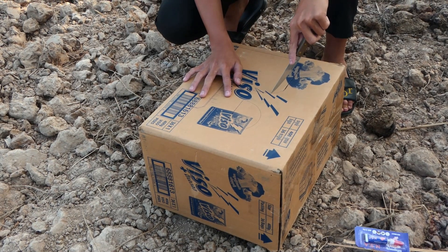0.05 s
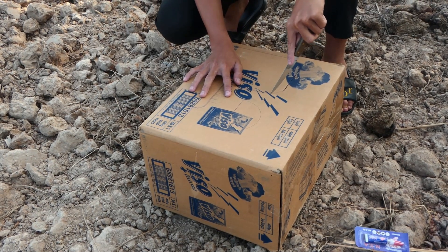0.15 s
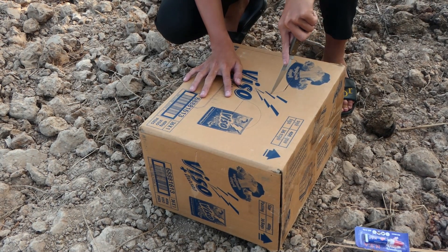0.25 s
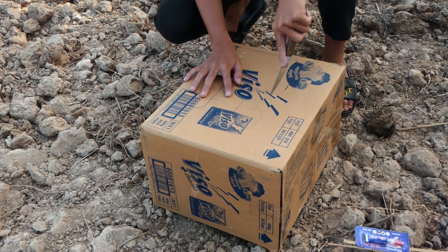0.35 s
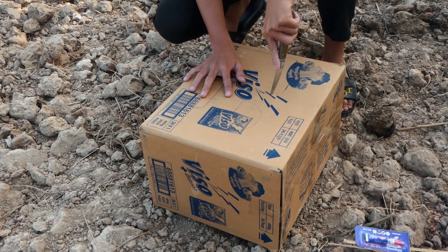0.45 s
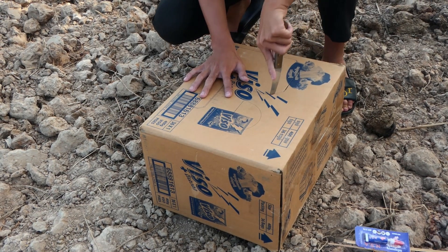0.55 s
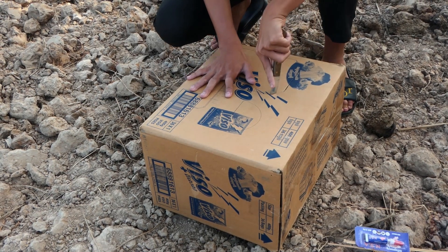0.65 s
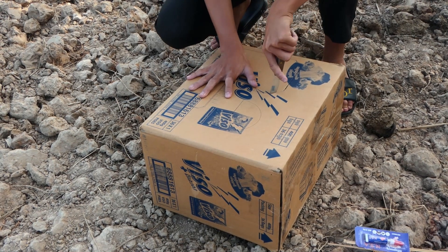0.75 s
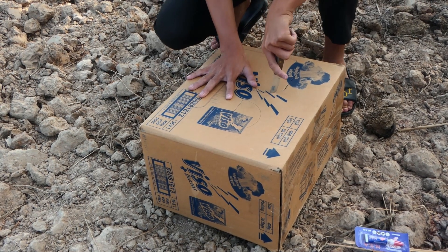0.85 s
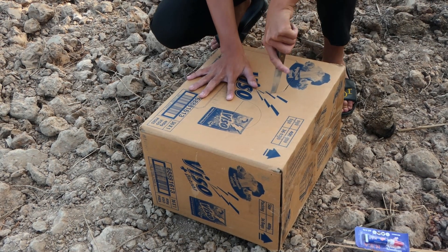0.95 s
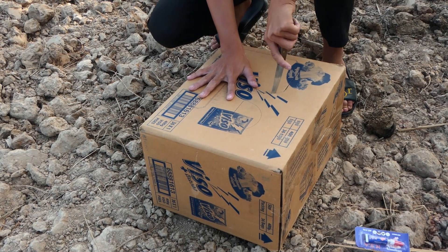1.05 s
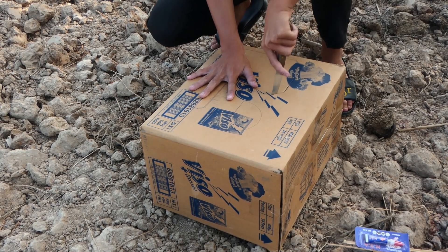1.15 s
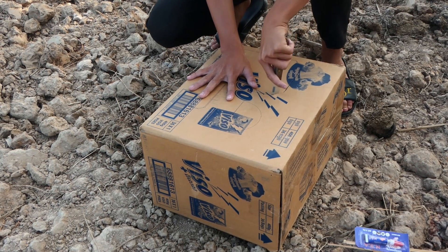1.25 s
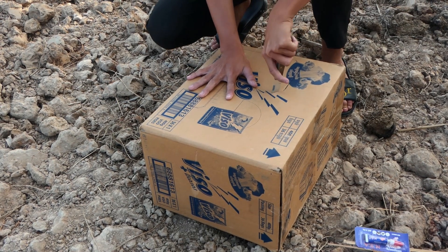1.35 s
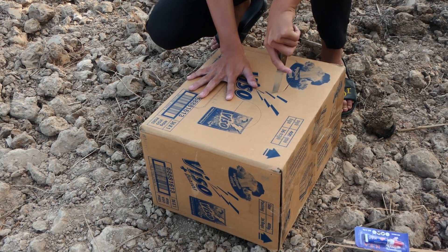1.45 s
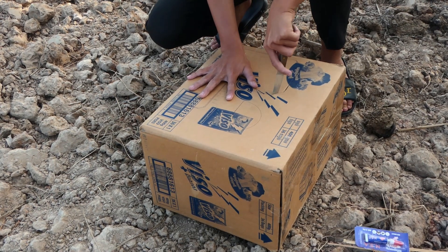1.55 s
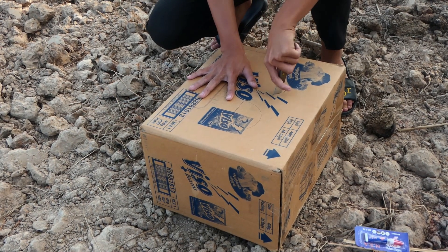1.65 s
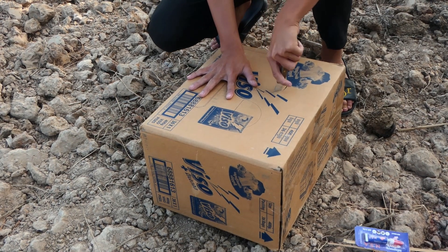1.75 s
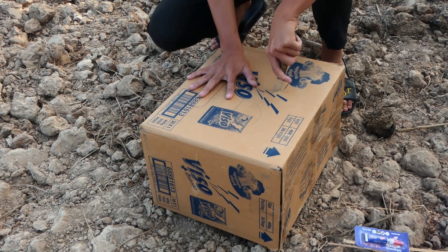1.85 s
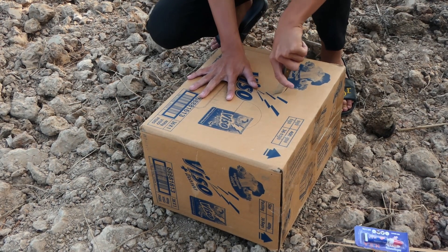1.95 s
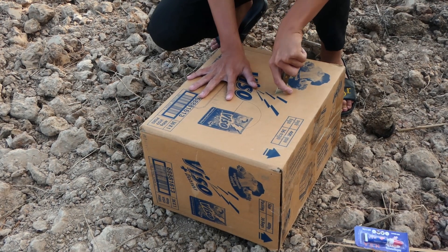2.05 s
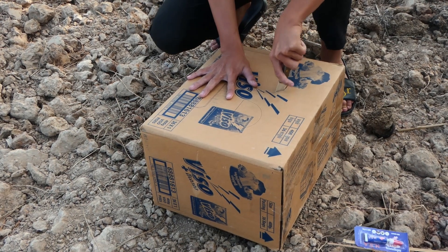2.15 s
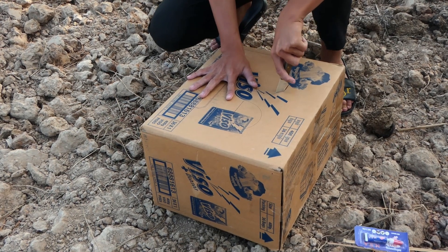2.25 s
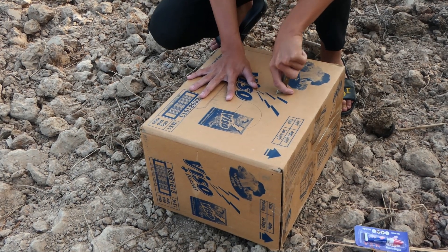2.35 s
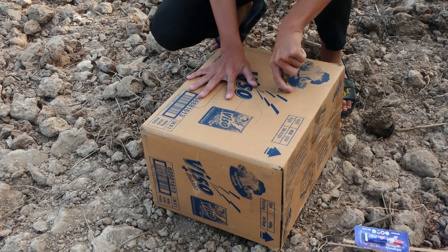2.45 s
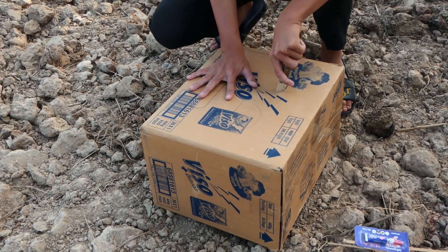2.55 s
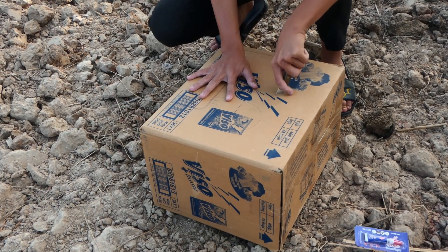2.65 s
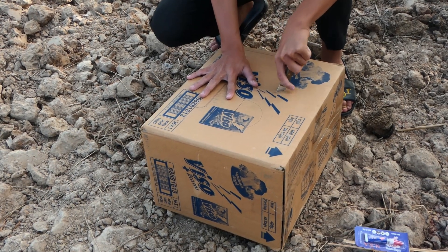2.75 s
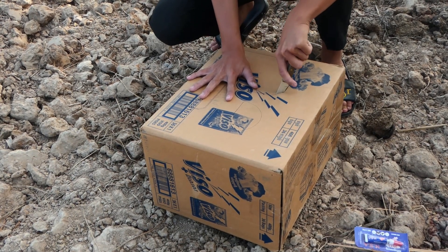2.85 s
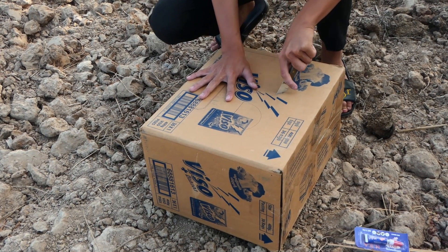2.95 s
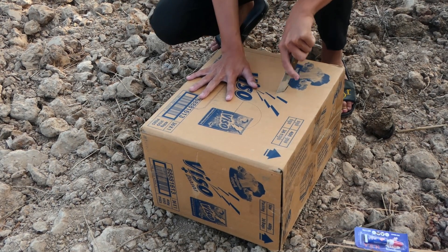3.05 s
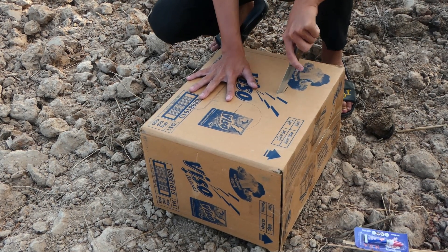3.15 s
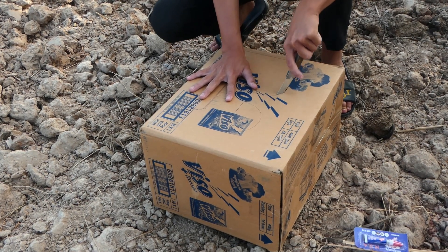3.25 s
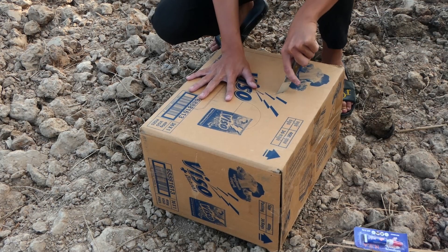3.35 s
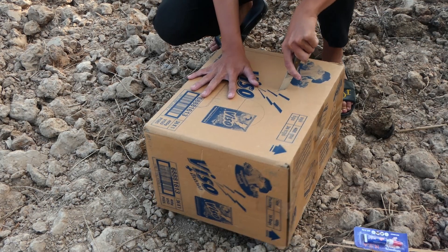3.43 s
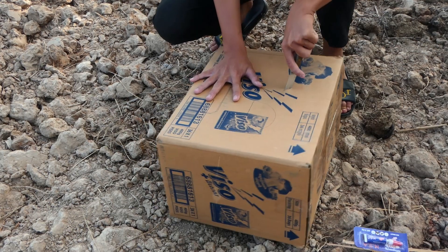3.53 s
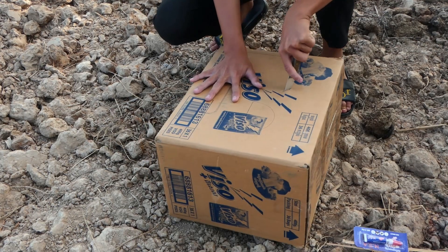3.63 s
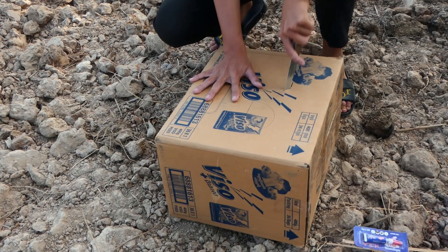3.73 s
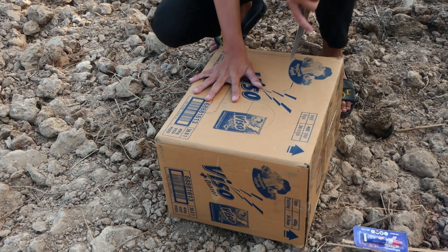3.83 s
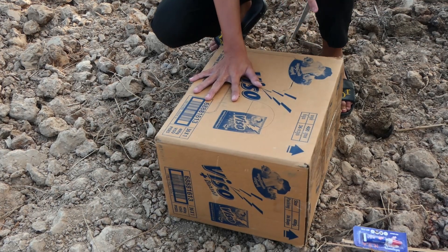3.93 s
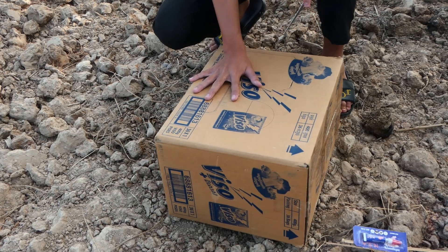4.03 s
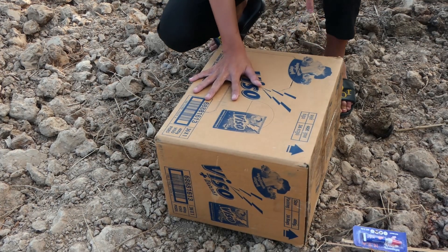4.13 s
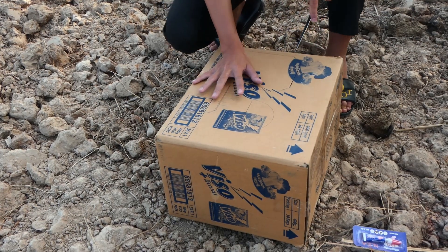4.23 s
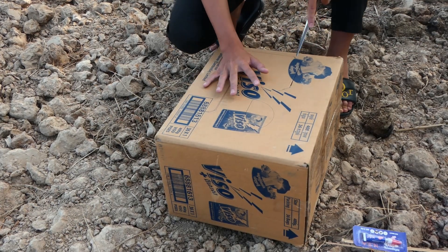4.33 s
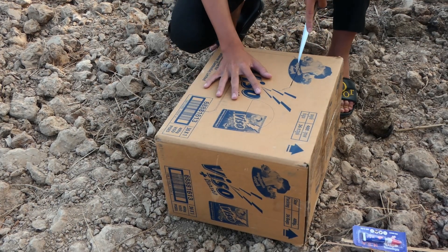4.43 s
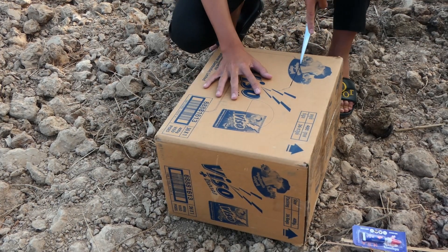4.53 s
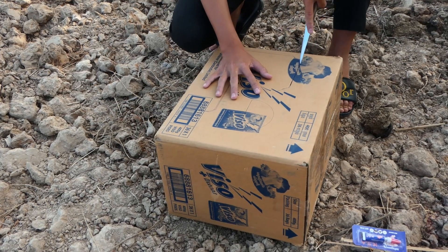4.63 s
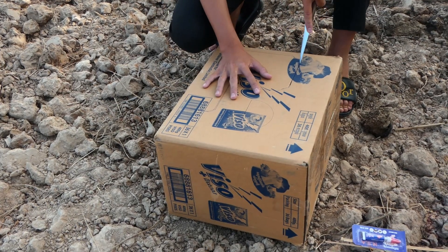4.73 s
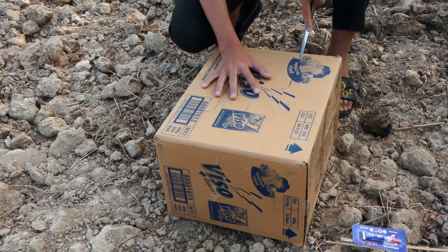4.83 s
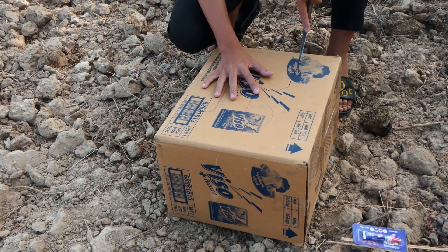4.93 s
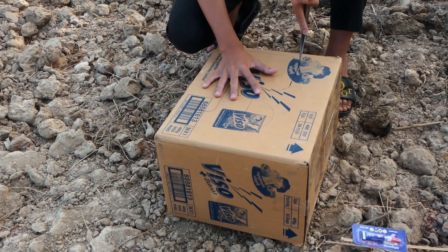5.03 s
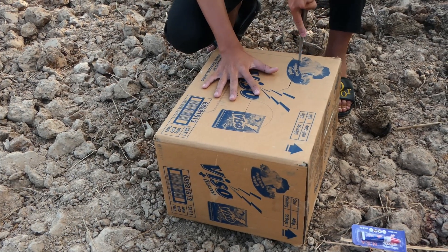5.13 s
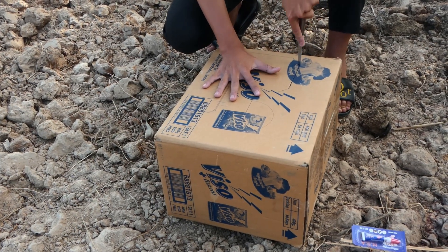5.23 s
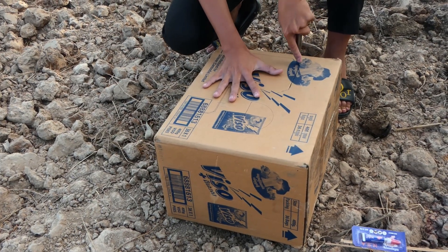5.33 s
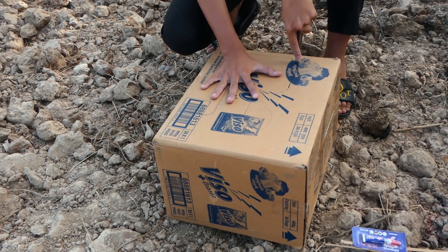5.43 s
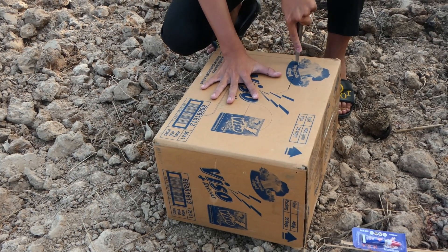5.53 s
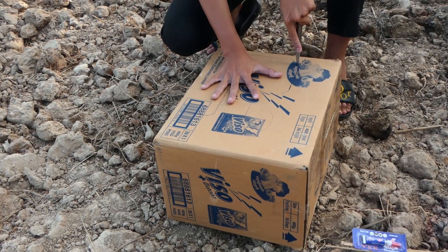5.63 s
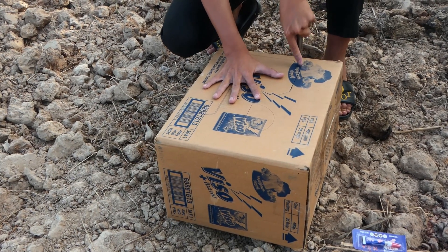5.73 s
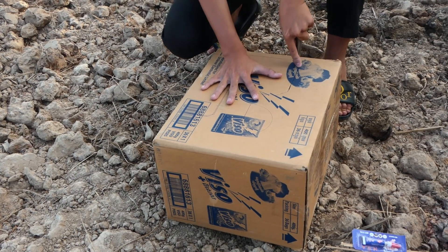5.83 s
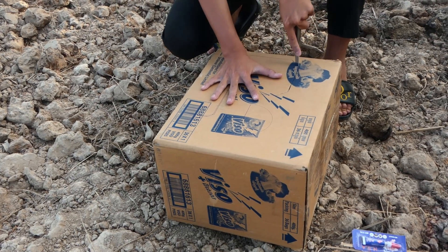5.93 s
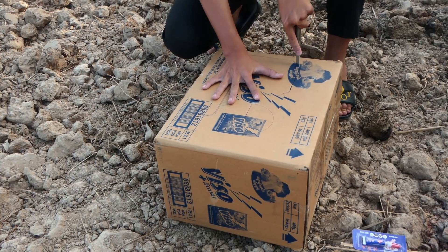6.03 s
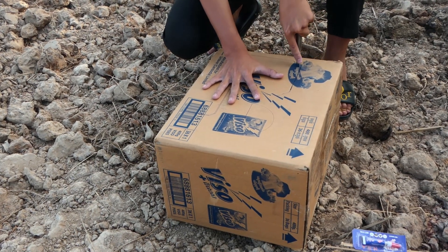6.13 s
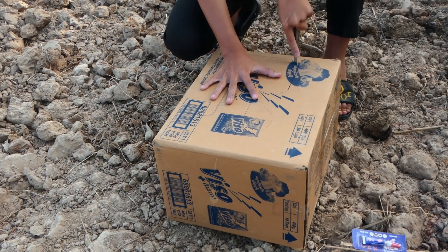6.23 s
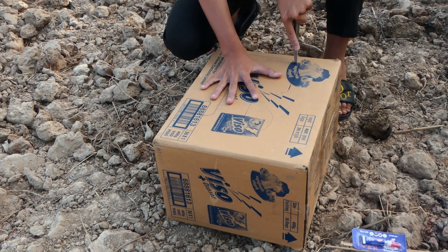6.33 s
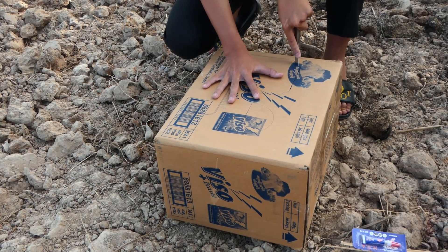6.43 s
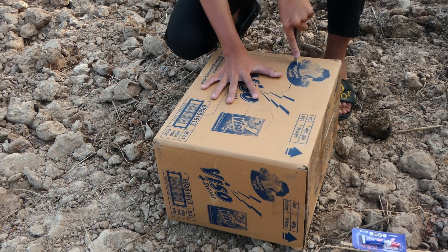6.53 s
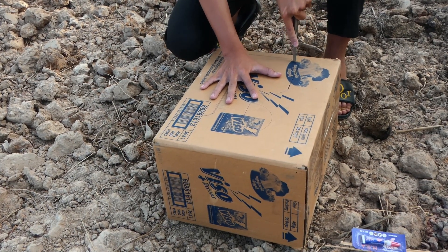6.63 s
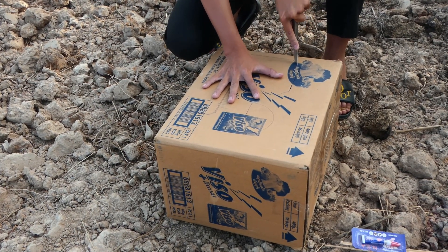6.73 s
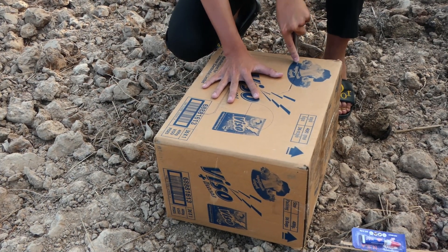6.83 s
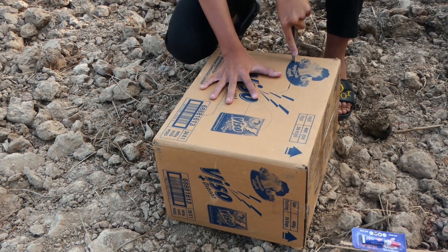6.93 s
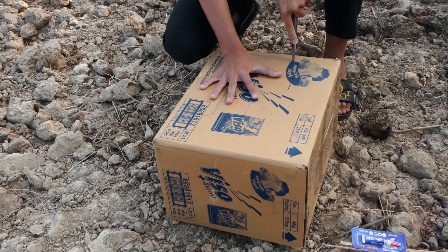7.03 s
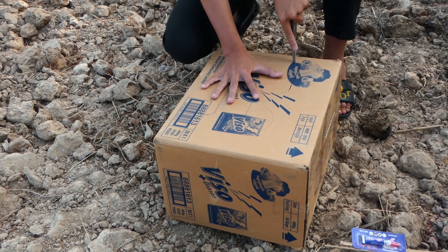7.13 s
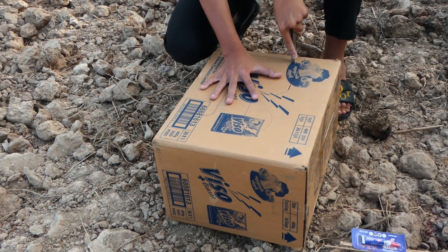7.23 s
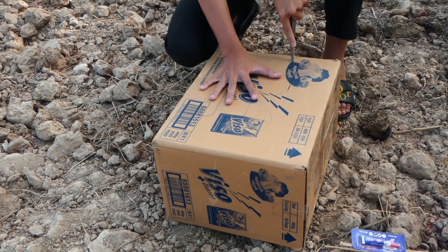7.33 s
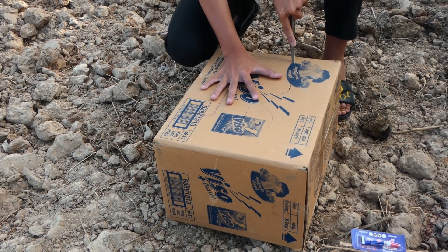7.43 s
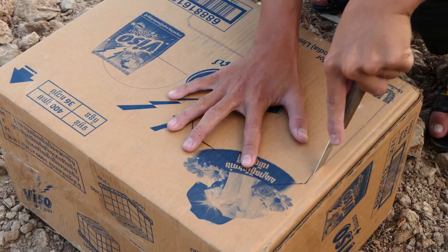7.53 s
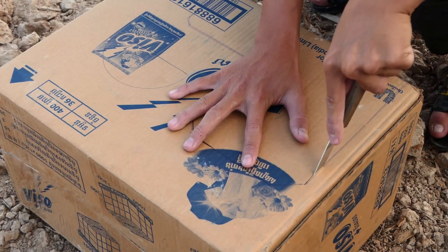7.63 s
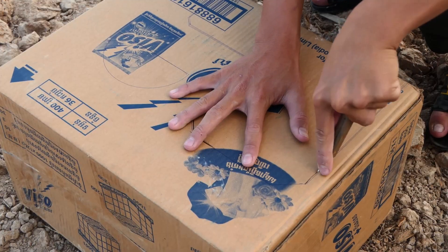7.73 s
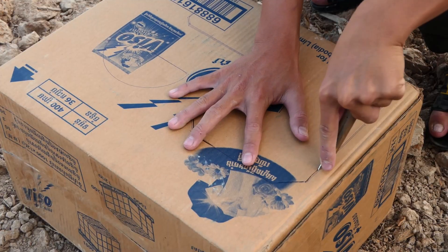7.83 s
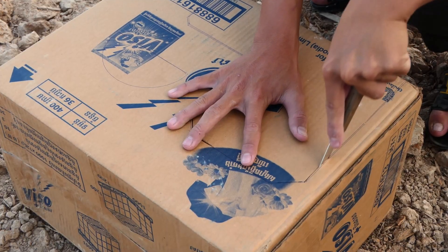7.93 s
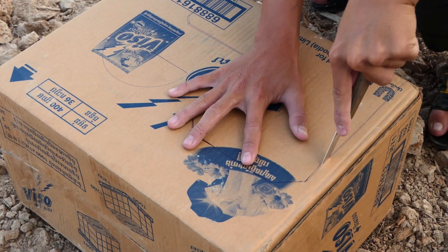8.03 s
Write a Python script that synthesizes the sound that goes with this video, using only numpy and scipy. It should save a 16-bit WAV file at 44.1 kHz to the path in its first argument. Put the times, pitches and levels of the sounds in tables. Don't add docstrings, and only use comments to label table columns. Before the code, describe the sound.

Gritty tearing strokes of a blade in corrugated board, close and dry, each with a hollow low boom and thin metallic hiss. The first run is uneven, with thumps, crackles and two quick squeaks. A near-quiet gap holds light lid taps. A loud snap and crumple open the second, steadier run, and muffled knocks on stones finish it. Far outdoor rush leans right over a quiet motor hum.

```python
import sys
import numpy as np
from scipy import signal
from scipy.fft import rfft, irfft, next_fast_len
from scipy.io import wavfile
from scipy.ndimage import uniform_filter1d, map_coordinates

SR = 44100
rng = np.random.default_rng(int(sys.argv[2]) if len(sys.argv) > 2 else 0)


def generate_wav(signal):
    frames = np.transpose(np.atleast_2d(signal))
    scaled = np.clip(frames, -1, 1) * 32767
    pcm = np.round(scaled).astype(np.int16)
    wavfile.write(sys.argv[1], SR, pcm)


def makeup_ratio(level_db):
    decades = np.asarray(level_db, float) / 20
    return 10 ** decades


N = 356328

# start in seconds, end in seconds.
CUTS = [
    (.12, .8),
    (.8, 3.95),
    (4.98, 7.53),
    (7.53, 8.2),
]


def unit(x):
    return x / np.sqrt(np.mean(x ** 2) + 1e-20)


def along(points, hz):
    f, v = np.transpose(points)
    return np.interp(np.log(hz + 1), np.log(f + 1), v)


def curves(rows):
    s, *cols = np.transpose(rows)
    return [np.interp(np.arange(N) / SR, s, c) for c in cols]


def during(start, end):
    t = np.arange(N) / SR
    return np.clip(np.minimum(t - start, end - t) * 200 + .5, 0, 1)


def wobble(rate):
    knots = rng.standard_normal(int(N * rate / SR) + 4)
    return map_coordinates(knots, [np.arange(N) * rate / SR])


def filtered(x, response):
    m = next_fast_len(N + 8192)
    return irfft(rfft(x, m) * response(np.fft.rfftfreq(m, 1 / SR)), m)[..., :N]


def resonances(modes, f):
    total = 0
    for k, (centre, width, db) in enumerate(modes):
        total = total + (-1) ** k * makeup_ratio(db) * 1j * f * width / (centre * centre - f * f + 1j * f * width)
    return total


def shaped(x, colour):
    y = filtered(x, colour)
    return y / y[0].std()


def air():
    # time in seconds, rush level in dB.
    rush_level = [(0.0, -50.5), (2.29, -49.5), (4.1, -50.5), (4.6, -50), (7.22, -47), (7.55, -51),
                  (8.08, -66.5)]
    # frequency in Hz, rush density in dB per Hz.
    rush_colour = [(28, -17), (64, -8), (110, -2.5), (283, -10), (480, -15.5), (5500, -20.5),
                   (10000, -28.5), (15800, -43)]
    # frequency in Hz, left-right likeness from 0 to 1.
    likeness = [(60, 1), (240, 0.34), (950, 0.62), (3770, 0.89), (15000, 0.47)]
    # frequency in Hz, left over right in dB.
    rush_left = [(60, -4.5), (380, -2.5), (2380, -7.5), (15000, 2)]
    # time in seconds, motor pitch in Hz, level in dB.
    motor = [(0.0, 65, -53), (1.8, 61, -57), (3.0, 59.3, -61), (5.2, 59.2, -55.5), (8.08, 62, -48)]

    def mid_and_side(f):
        angle = np.arccos(np.clip(along(likeness, f), -1, 1)) / 2
        return makeup_ratio(along(rush_colour, f)) * [np.cos(angle), np.sin(angle)]

    (rush_db,), (drone_hz, drone_db) = curves(rush_level), curves(motor)
    mid, side = filtered(rng.standard_normal((2, N)), mid_and_side)
    rush = filtered(np.array([mid + side, mid - side]), lambda f: makeup_ratio(along(rush_left, f) * [[.5], [-.5]]))
    rush = makeup_ratio(rush_db + 1.5 + .5 * wobble(12)) * unit(rush)
    turns = np.cumsum(drone_hz + 0.83 * wobble(2.7)) / SR
    drone, apart = makeup_ratio(1.2 * wobble(4)) * np.sin(2 * np.pi * (turns + [[0], [.25]]))
    return rush + makeup_ratio(drone_db) * (drone + makeup_ratio(-5) * apart * [[1], [-1]])


def ground(x):
    # frequency in Hz, time to fall 60 dB in seconds.
    scatter = [(150, 0.094), (1500, 0.12), (10000, 0.019)]
    hz, t, z = signal.stft(rng.standard_normal((2, SR // 6)), SR, nperseg=128)
    tail = signal.istft(z * makeup_ratio(-60 * t / along(scatter, hz)[:, None]), SR, nperseg=128)[1]
    return signal.fftconvolve(x[None], tail / np.linalg.norm(tail[0]), axes=1)[:, :N]


def squeak():
    # time in seconds, pitch in Hz, level in dB, overtones in dB over the tone.
    squeaks = [
        [(1.381, 1290, -41, 9), (1.392, 1460, -46, 6), (1.397, 2050, -38, -1), (1.4, 2660, -32, 1),
         (1.413, 2800, -27, -10), (1.417, 3300, -48, 6), (1.425, 3840, -45, 16)],
        [(3.497, 1896, -40, 9), (3.506, 2696, -39, 3), (3.518, 3380, -29.5, 0.5), (3.524, 4390, -50, 14),
         (3.531, 3350, -36, 5), (3.536, 2980, -32, 7), (3.547, 3440, -32, 3), (3.558, 2770, -27.5, -0.5),
         (3.574, 1710, -62, -9)],
    ]
    # multiple of the pitch, level in dB.
    parts = [(2, -6), (3, -8), (4, -16)]
    out = np.zeros(N)
    for rows in squeaks:
        hz, level_db, over_db = uniform_filter1d(curves(rows), size=200)
        phase = 2 * np.pi * np.cumsum(hz * (1 + 0.0283 * wobble(350) + 0.034 * wobble(1500))) / SR
        overtones = sum(makeup_ratio(db + 1.0 * wobble(300)) * np.sin(k * phase) for k, db in parts)
        blade = unit(filtered(rng.standard_normal(N), lambda f: resonances([(9700, 1200, 0)], f) ** 2))
        blade = makeup_ratio(-8.5 + 2.4 * wobble(220)) * blade
        tone = makeup_ratio(3.1 * wobble(300)) * np.sin(phase) + makeup_ratio(over_db) * (overtones + blade)
        out += during(rows[0][0], rows[-1][0]) * makeup_ratio(level_db) * tone
    return out


def clicks(events, t60, cycles, lift_db):
    out, t = np.zeros(N + SR), np.arange(SR // 50) / SR
    for s, db, hz in events:
        noise = rng.standard_normal((2, len(t)))
        turns = hz * t * (1.1 - 25 * t) + .05 * np.cumsum(noise[0])
        ring = .7 * np.sin(2 * np.pi * turns) * np.exp(-t * hz / cycles)
        burst = 0.56 * makeup_ratio(-60 * t / t60) * noise[1]
        attack = 1 - np.exp(-t / 0.00048)
        out[round(s * SR):][:len(t)] += makeup_ratio(db + lift_db) * (ring + burst) * attack
    return out[:N]


def snaps():
    # start in seconds, peak in dB, pitch in Hz.
    fibres = [(0.26, -24, 1270), (0.3013, -24, 1290), (0.4743, -26, 1290), (0.5045, -39, 1270),
              (0.6185, -10.5, 2960), (0.863, -27, 1840), (1.201, -31, 2850), (1.6327, -30, 1270),
              (1.9934, -20.5, 4150), (2.3416, -19.5, 4100), (2.374, -29, 1290), (2.4191, -20, 1380),
              (3.6328, -24.5, 936), (4.6116, -30.5, 1650), (5.0903, -30.5, 1170), (5.2849, -19.5, 1160),
              (5.3273, -5.5, 1950), (5.526, -37, 1350), (5.7583, -25.5, 1335), (5.8326, -20.5, 1220),
              (6.4533, -28, 1380), (6.977, -25, 1690)]
    # start in seconds, peak in dB.
    bites = [(1.2005, -27), (1.5724, -28), (1.9825, -25.5), (2.169, -29), (2.4182, -32), (2.52, -30),
             (2.6213, -21), (2.934, -21), (3.0664, -29), (3.441, -28), (3.475, -27), (5.2829, -21.5),
             (5.3273, -23), (5.534, -26), (6.127, -28), (6.4173, -26), (6.4515, -28), (6.6233, -29),
             (6.765, -26), (6.796, -25), (7.1265, -25.5), (7.1695, -25), (7.473, -23), (7.509, -27),
             (7.7159, -29)]
    tick_hz = 3905 * np.exp(0.183 * rng.standard_normal(len(bites)))
    ticks = np.column_stack([bites, tick_hz])
    lid = filtered(clicks(fibres, 0.0089, 7.7, 0), lambda f: resonances([(2070, 3900, 0.0042)], f))
    blade = filtered(clicks(ticks, 0.012, 6.7, 1.5), lambda f: resonances([(6450, 8500, 0)], f) ** 2)
    return lid + blade


def crumples():
    # start in seconds, level in dB.
    bucklings = np.array([
        (3.572, -30),
        (3.588, -33),
        (3.631, -33),
        (4.611, -41),
        (5.281, -34),
        (5.322, -23),
    ])
    t60 = 0.084
    since = np.arange(N) / SR - bucklings[:, :1]
    fade = makeup_ratio(bucklings[:, 1:] - 60 * np.abs(since) / t60) * np.clip(since / 0.0033, 0, 1)
    rough = makeup_ratio(3.7 * wobble(300)) * rng.standard_normal(N)
    return fade.sum(0) * unit(filtered(rough, lambda f: resonances([(615, 650, 0)], f) ** 2))


def thumps():
    # start in seconds, peak in dB, pitch in Hz.
    flutes = [(0.257, -20.5, 184), (0.386, -40, 242), (0.616, -14, 210), (0.648, -19, 227), (0.9, -10, 201),
              (1.422, -22.5, 214), (2.233, -18.5, 301), (2.427, -14.5, 242), (2.431, -10, 231.6),
              (2.559, -23, 274), (2.585, -19, 224), (2.61, -19, 205), (2.864, -24, 234),
              (3.368, -22.5, 310), (3.574, -21.5, 291), (3.585, -14, 198), (3.633, -14.5, 207),
              (3.824, -19, 322), (5.282, -17, 323), (5.32, -13.5, 332), (5.461, -33.5, 209),
              (5.889, -28, 256), (5.952, -27, 288), (6.303, -30, 352), (6.619, -30, 282), (7.199, -28, 310)]
    # start in seconds, peak in dB, pitch in Hz.
    taps = [
        (4.498, -35.5, 187),
        (4.549, -36, 163),
        (4.613, -29.5, 253),
        (4.707, -40, 156),
        (5.035, -38, 115),
        (5.095, -28.5, 299),
        (5.204, -28.5, 182),
    ]
    # start in seconds, peak in dB, pitch in Hz.
    shifts = [
        (0.178, -31.5, 107.3),
        (2, -32, 114),
        (2.289, -27.5, 100),
        (2.727, -25, 154),
        (2.879, -26, 111),
        (3.669, -27, 107),
        (5.895, -31, 113),
    ]
    # start in seconds, peak in dB, pitch in Hz.
    knocks = [(7.556, -23.5, 137), (7.602, -36, 142), (7.619, -30, 140), (7.715, -18, 179),
              (7.798, -27, 130), (7.833, -37, 144), (7.863, -20, 245), (7.903, -21, 139),
              (7.954, -30.5, 214), (8.005, -34, 122), (8.04, -32, 190)]
    modes = [(0.999, -0.5), (1.49, -21.5), (2.307, -19), (0.665, -13)]  # (multiple of the pitch, dB)

    def wall(f):
        return 1 / (1 + 1.4j * f / 520 - (f / 520) ** 2) ** 2 * (1j * f / 70) / (1 + 1j * f / 70)

    out, t = np.zeros(N + SR), np.arange(SR // 5) / SR
    for hits, t60 in [(flutes, 0.044), (taps, 0.038), (shifts, 0.057), (knocks, 0.043)]:
        for s, db, hz in hits:
            shape = makeup_ratio(-60 * t / t60) * (1 - np.exp(-t * hz / 1.1)) ** 2
            turns = hz * (t + 0.00092 * (1 - np.exp(-t / 0.005)))
            ring = sum(makeup_ratio(level) * np.sin(2 * np.pi * (k * turns + rng.random())) for k, level in modes)
            out[round((s - .003) * SR):][:len(t)] += makeup_ratio(db) * ring * shape / shape.max()
    return filtered(out[:N], wall)


def strokes():
    # start in seconds, length in seconds, effort in dB, lean in dB from start to end.
    first_side = [(0.217, 0.063, -43, 5), (0.471, 0.26, -33.5, 3), (0.922, 0.18, -44.5, 8),
                  (1.203, 0.12, -34, 4), (1.384, 0.18, -43, 6), (1.63, 0.12, -35, 3),
                  (1.818, 0.14, -50, -3), (2.021, 0.097, -36.5, 6.5), (2.179, 0.13, -49, 6.5),
                  (2.373, 0.082, -37.5, 1), (2.523, 0.15, -49.5, -0.5), (2.667, 0.096, -46, 1),
                  (2.804, 0.1, -49, 6), (3.018, 0.21, -47, 10), (3.281, 0.13, -42.5, 6.5),
                  (3.465, 0.16, -45.5, 7.5), (3.627, 0.11, -52.5, -12), (3.748, 0.12, -40.5, 2)]
    # start in seconds, length in seconds, effort in dB, lean in dB.
    next_sides = [(5.272, 0.16, -33, -2.5), (5.522, 0.15, -40, -1.5), (5.743, 0.12, -36.5, 6.5),
                  (5.921, 0.15, -42.5, -1), (6.132, 0.093, -37, -1), (6.288, 0.1, -37, 0),
                  (6.458, 0.093, -34.5, 0), (6.619, 0.12, -41, 1), (6.809, 0.11, -34, 3),
                  (6.97, 0.13, -41, 3.5), (7.183, 0.11, -36, 0), (7.344, 0.12, -41.5, -1.5),
                  (7.513, 0.12, -45.5, -4.5), (7.714, 0.11, -37, 4.5)]
    # start in seconds, length in seconds, effort in dB.
    jabs = [
        (0.299, 0.04, -52),
        (0.376, 0.048, -47.5),
        (0.428, 0.056, -49),
    ]
    # start in seconds, length in seconds, effort in dB.
    drags = [
        (0.868, 0.021, -49.5),
        (1.982, 0.023, -54),
        (2.328, 0.037, -51.5),
        (2.919, 0.051, -49.5),
        (2.983, 0.044, -53.5),
        (5.05, 0.39, -53),
        (6.416, 0.024, -50),
        (6.761, 0.035, -57),
        (7.124, 0.037, -53),
        (7.472, 0.026, -50.5),
        (7.925, 0.39, -54),
    ]
    # fizz in dB, its rise in dB/s as the slit lengthens, boom in dB.
    box_response = [(-53.5, 13, -33), (-45, 0.5, -34), (-48.5, 1.24, -41), (-45.5, -7.5, -40.5)]
    usual_db = -40
    fizz_grows, boom_grows = 0.82, 0.66

    moves = [(*row, 0, 0) for row in list(first_side) + list(next_sides)]
    moves += [(*row, 0, 0, 0) for row in jabs]
    moves += [(*row, 0, 1.5, -5) for row in drags]
    gains, t = np.zeros((3, N)), np.arange(N) / SR
    for s, length, effort_db, swell_db, hiss_db, weight_db in moves:
        cut = sum(s > start for start, end in CUTS[1:])
        fizz_db, rise_db, boom_db = box_response[cut]
        fizz_db += hiss_db + rise_db * (s - CUTS[cut][0]) + fizz_grows * (effort_db - usual_db)
        boom_db += weight_db + boom_grows * (effort_db - usual_db)
        part = slice(round((s - .04) * SR), round((s + length + .07) * SR))
        since = t[part] - s
        u = since / length

        def edge(lag):
            return 1 / (1 + np.exp((lag - since) / 0.0036)) / (1 + np.exp((since - lag - length) / 0.0061))

        lean_db = swell_db * np.clip(2 * u - 1, -.8, .8)
        slow = (2 * u - 1) ** 2
        gains[0, part] += makeup_ratio(effort_db + lean_db + 3.0 - 7.46 * slow) * edge(0)
        gains[1, part] += makeup_ratio(fizz_db + lean_db + 4.0 - 9.6 * slow) * edge(0)
        gains[2, part] += makeup_ratio(boom_db + 1.06 * lean_db + 2.5 - 4.8 * slow) * edge(0.0037)
    return gains


def tearing(clump, clump_db, grain_db, grain_hz, side_db):
    bursts = unit(makeup_ratio(clump_db * clump + grain_db * wobble(grain_hz)))
    return bursts * rng.standard_normal((2, N)) * makeup_ratio([[0], [side_db]])


def patchy(x, patch_db):
    z = signal.stft(x, nperseg=256)[2]
    field = uniform_filter1d(rng.standard_normal(z.shape[1:]), size=6, axis=0)
    field = uniform_filter1d(field, size=12, axis=1)
    return signal.istft(z * makeup_ratio(patch_db * unit(field)), nperseg=256)[1][:, :N]


def sawing():
    # frequency in Hz, width in Hz, dB over the broad colour.
    lids = [
        [(1117, 28, 7), (1290, 160, 6.5), (1830, 100, 4.5), (2240, 97, 2.5), (2760, 230, 8), (3690, 140, 6),
         (4220, 120, 5.5)],
        [(775, 59, 3.5), (1264, 170, 3.5), (1830, 200, 1.5), (2790, 340, 4.5), (3420, 93, 2)],
        [(554, 65, 2.5), (1340, 440, 2.5), (2150, 195, 2.5), (2790, 240, 0), (4870, 230, 2.5), (5480, 72, 6)],
        [(577, 110, 0), (1380, 62, -2), (2830, 240, 0.5), (4020, 140, 1)],
    ]
    # frequency in Hz, density in dB per Hz.
    boards = [
        [(300, -40), (500, -1.5), (1300, -3.5), (3000, -9), (4400, -14), (4800, -29), (7000, -45)],
        [(290, -51), (500, -5.5), (1000, -4), (1250, -1), (1600, -0.5), (6000, -16.5), (7800, -53)],
        [(260, -30), (450, -4), (1060, -2), (1360, 0), (2520, -10.5), (5560, -20), (6000, -15), (7800, -42)],
        [(290, -28), (500, -6.5), (973, -9.5), (1390, -5.5), (6000, -21.5), (7800, -47)],
    ]
    # frequency in Hz, density in dB per Hz.
    hollows = [
        [(41, -57), (70, -36), (227, -0.5), (389, -12.5), (491, -26), (560, -32), (730, -50), (1230, -120)],
        [(35, -38), (60, -35), (119, -12.5), (241, -0.5), (404, -7.5), (520, -26), (730, -54), (1230, -120)],
        [(47, -47), (80, -14), (178, -11.5), (297, -2), (361, -2.5), (440, -18.5), (730, -30.5), (1230, -120)],
        [(24, -43), (40, -11), (91, 2.5), (242, -2), (408, -15), (452, -29), (780, -29), (1320, -120)],
    ]
    # frequency in Hz, density in dB per Hz.
    blade_hiss = [(2060, -20), (3500, -6.5), (4280, -8), (7880, -11.5), (9770, -6), (13200, -14.5),
                  (15100, -30), (15800, -32)]
    # time in seconds, level in dB.
    rocking = [
        (7.53, -38),
        (7.62, -31.5),
        (8.08, -35.5),
    ]

    clump = 1.87 * np.tanh(wobble(90) / 2.3)
    rasp, fizz, boom = strokes()
    boom = boom + during(7.557, 8.2) * makeup_ratio(curves(rocking)[0] - 0.5)
    hiss = patchy(tearing(clump, 1.44, 1.65, 900, -11.5), 1.7)
    out = fizz * shaped(hiss, lambda f: makeup_ratio(along(blade_hiss, f)))
    for cut, hollow, board, lid in zip(CUTS, hollows, boards, lids):
        def colour(f):
            return makeup_ratio(along(board, f)) * (1 + sum(np.abs(resonances([mode], f)) ** 2 for mode in lid))

        scrape = rasp * shaped(patchy(tearing(clump, 1.0, 2.2, 400, -14), 1.6), colour)
        drum = boom * shaped(tearing(clump, 1.9, 0.8, 40, -26), lambda f: makeup_ratio(along(hollow, f)))
        out += during(*cut) * (scrape + drum)
    return out


def scene():
    # frequency in Hz, left over right in dB.
    box_left = [(60, -1), (180, -3), (550, -2.5), (1650, -2), (4970, -0.5), (15000, 1)]
    middle, side = sawing()
    box = middle + thumps() + crumples() + snaps() + squeak()
    direct = filtered(np.array([box + side, box - side]), lambda f: makeup_ratio(along(box_left, f) * [[.5], [-.5]]))
    return direct + makeup_ratio(-15.5) * ground(box) + air()


def band_limit(x):
    return signal.sosfilt(signal.butter(12, 15830, fs=SR, output="sos"), x)


def record(dry):
    mix = filtered(dry, lambda f: (f < 15830) / (1 + (35 / (f + 1)) ** 3))
    return band_limit(mix)


dry = scene()
out = record(dry)
generate_wav(out)
```